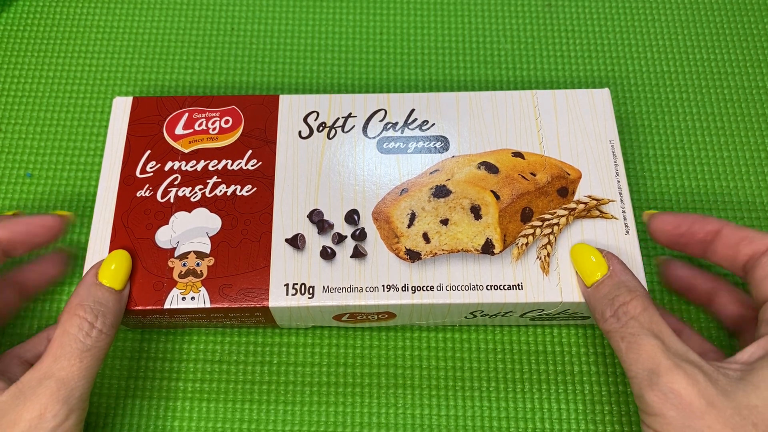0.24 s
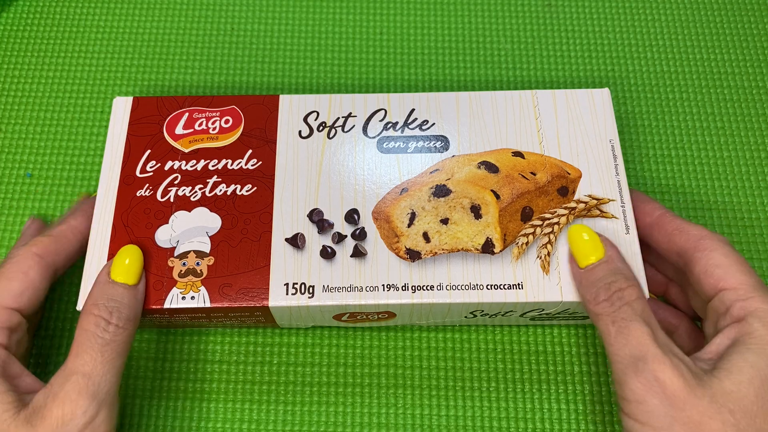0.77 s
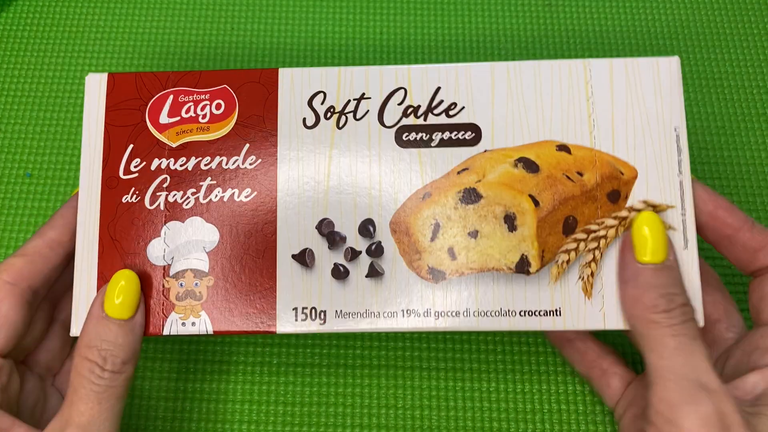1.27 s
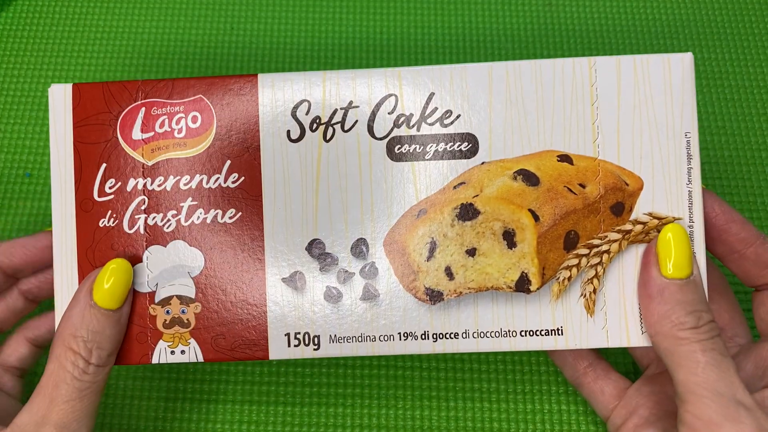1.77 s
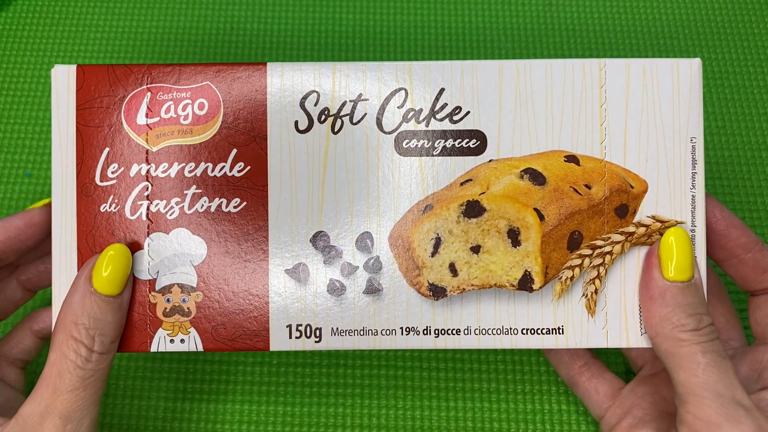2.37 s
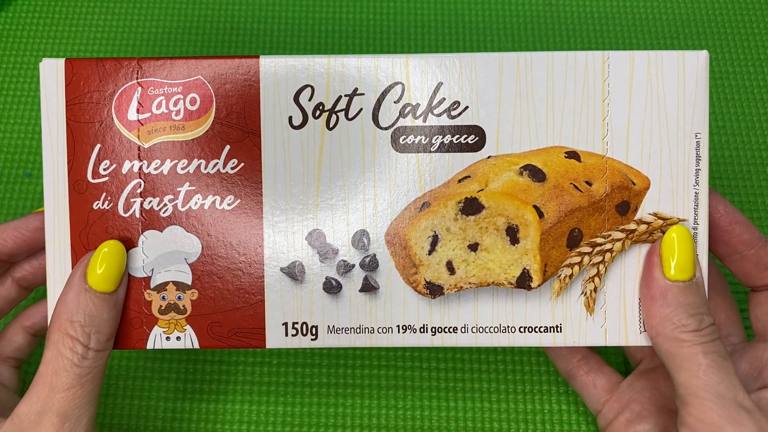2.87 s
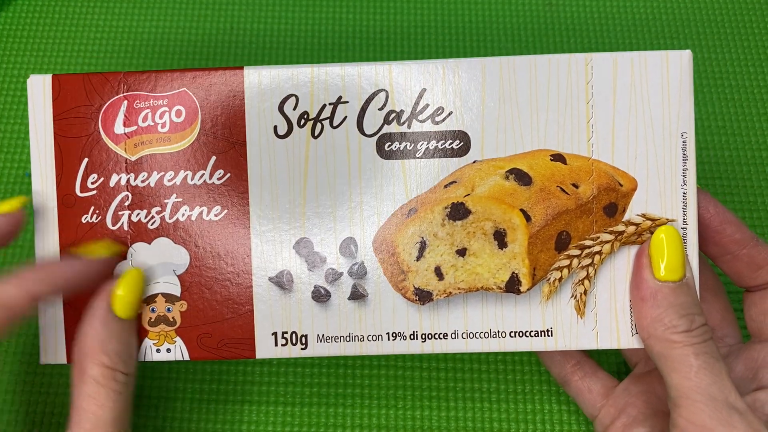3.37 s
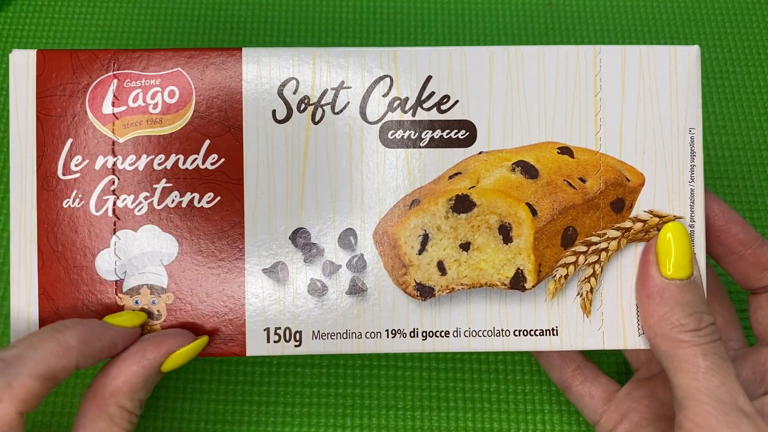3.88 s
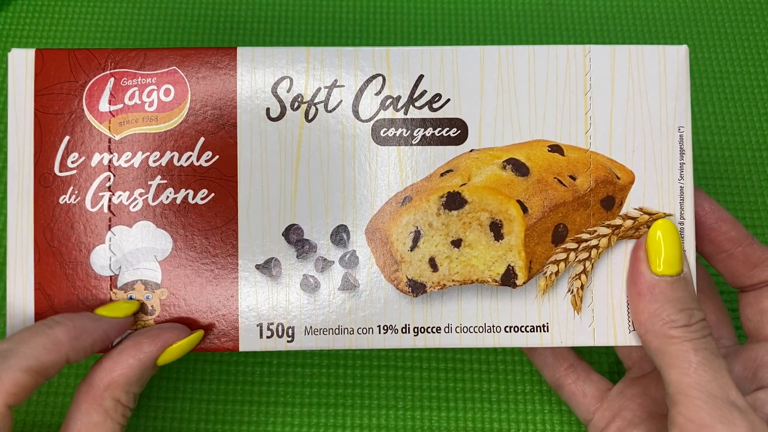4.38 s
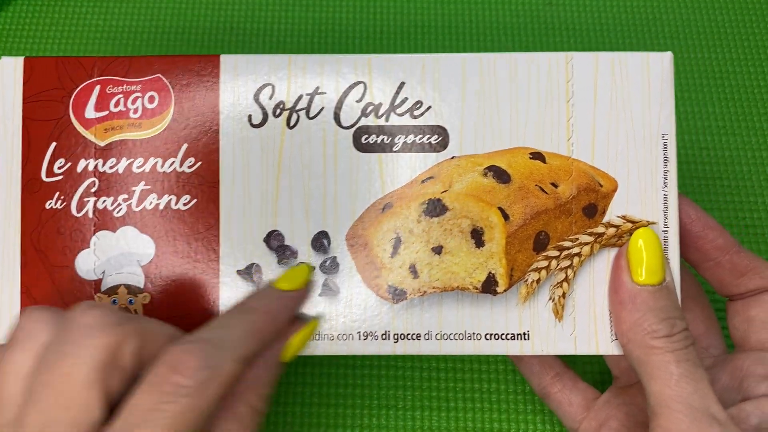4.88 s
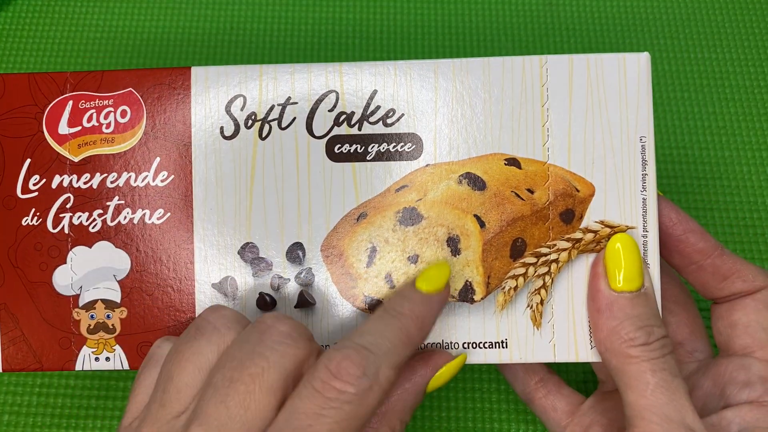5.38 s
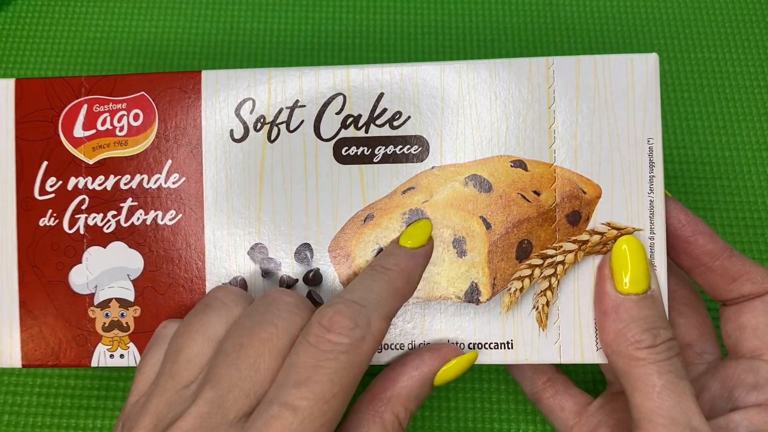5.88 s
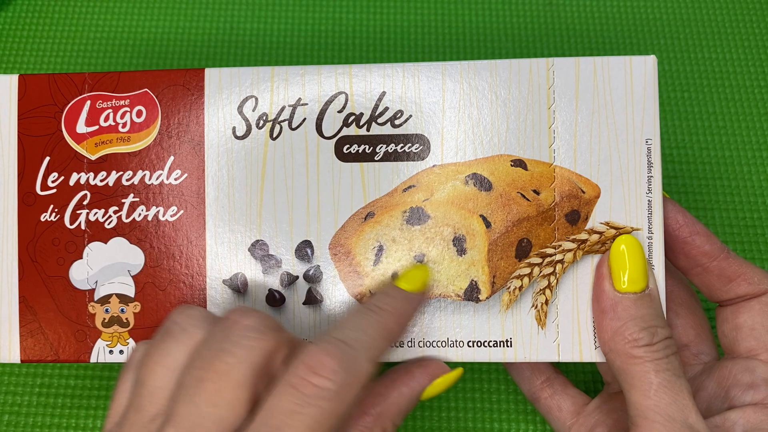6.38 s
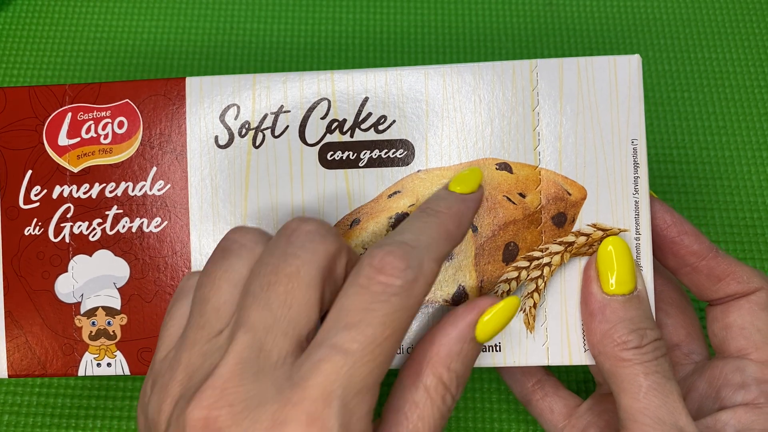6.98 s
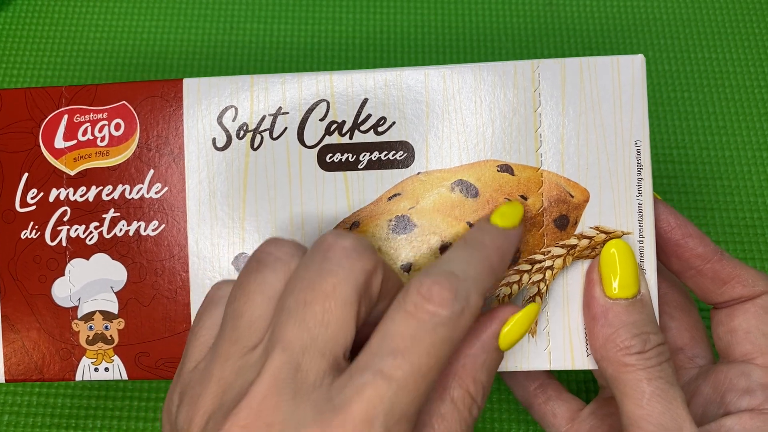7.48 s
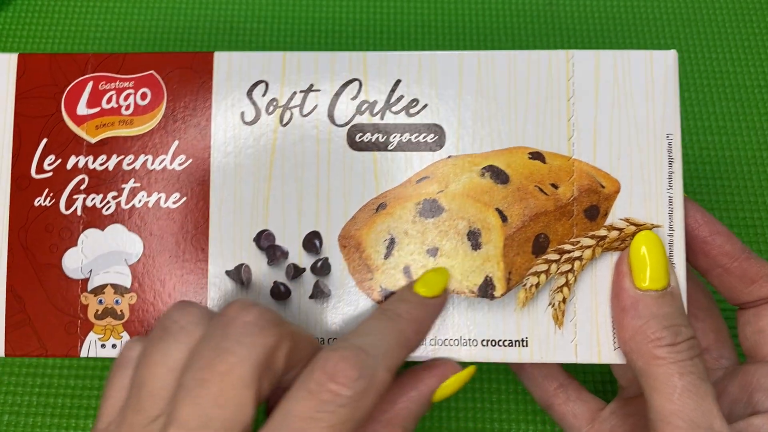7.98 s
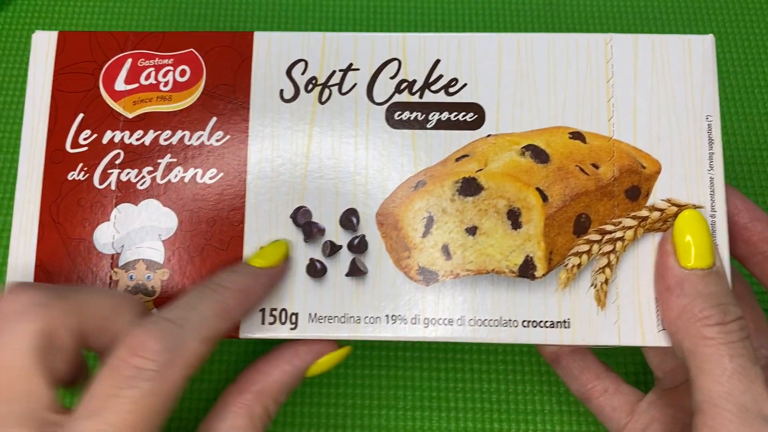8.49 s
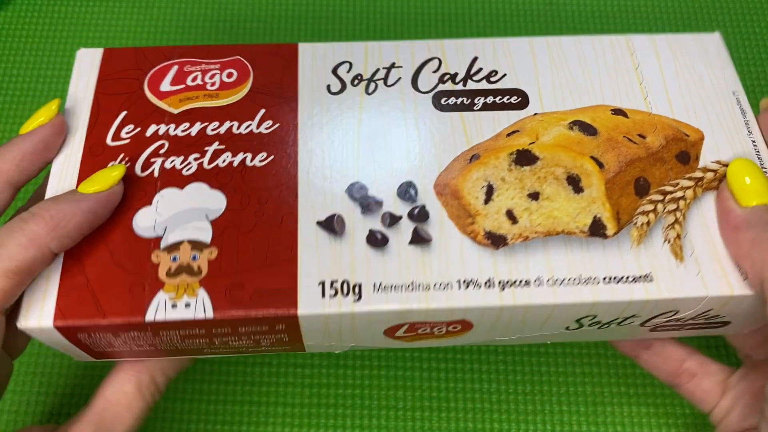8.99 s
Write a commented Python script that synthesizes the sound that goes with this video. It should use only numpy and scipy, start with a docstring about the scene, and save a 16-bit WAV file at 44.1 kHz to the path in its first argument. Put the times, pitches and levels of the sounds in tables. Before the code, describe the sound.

In a small, quiet room, close fingernail taps make a thin cardboard box tick and knock with a short hollow ring. The tapping starts busy and irregular, then thins out and softens while fingertips rub quietly across the surface. A few soft handling thumps come at the end. Behind it, the phone microphone picks up a faint wavering hum and a far engine rising in pitch outside.

```python
"""In a small room, fingernails tap a thin cardboard box close to a phone, first on its ends, then on
its face. Each tap sends a bending wave through the card (treble first, bass late) and makes the
hollow box ring. Between taps, fingers slide over the card and bump it as they shift their grip.
A low hum wavers underneath, and a far engine revs up outside."""
import sys
import numpy as np
from scipy import signal
from scipy.fft import rfft, irfft, next_fast_len
from scipy.io import wavfile
from scipy.ndimage import uniform_filter1d

SR = 44100
rng = np.random.default_rng(int(sys.argv[2]) if len(sys.argv) > 2 else 0)


def to_wav(sig):
    """Store sig (one row per channel, or 1-D mono) as 16-bit WAV at the path in sys.argv[1].

    Samples outside -1..1 are clipped; the rate is SR.
    """
    pcm = np.clip(np.atleast_2d(sig), -1, 1) * 32767
    pcm = np.round(pcm).astype(np.int16)
    wavfile.write(sys.argv[1], SR, pcm.T)  # frames by channels


N = 407484

# The tones the box rings with. Each row: pitch in Hz, level in dB when tapped on the ends,
# level in dB when tapped on the face, seconds to fade by 60 dB (called t60).
BOX_TONES = [(88.7, -13, -16, 0.023), (143.4, 1.5, 9, 0.063), (206, -8, -9.5, 0.16),
             (288.6, -6, -8.5, 0.067), (319.2, -7, -11.5, 0.16), (333, 5, 7, 0.016),
             (403.8, -4.5, -9.5, 0.1), (543.8, -10.5, -11.5, 0.096), (535, -25, 8, 0.023),
             (581, -17, 7, 0.014), (762, -17.5, -20.5, 0.22), (772, 10.5, 4.5, 0.023),
             (853, -9.5, -16.5, 0.11), (907, 5, -1.5, 0.022), (1043, -12.5, -18.5, 0.059),
             (1241, -5, -14.5, 0.063), (1284, 6, -36, 0.0081), (1569, -8.5, -8.5, 0.03),
             (2000, -2, 1.5, 0.015), (2102, 0, 5, 0.011), (2940, -10.5, -8, 0.016), (3450, -4, 10.5, 0.002)]


def nail_taps():
    """A nail ticks, the card bends and the box rings. Gives the close sound and what feeds the room."""
    # Each row: start in seconds, level in dB, then the relative strength in dB of the box's hollow
    # ring, the knock of its side walls and the tick of the nail.
    taps = [(0.005, -32.5, -7, -13, 0), (0.023, -24, -24, -18.5, -11.5), (0.263, -38, -19, -18.5, -5.5),
            (0.303, -49.5, -20, -16, -7), (0.33, -24, -10, -11.5, -17), (0.337, -27, -20, -13, -3.5),
            (0.393, -25.5, -26, -12, -11.5), (0.463, -20.5, -12.5, -12.5, -14.5),
            (0.484, -29.5, -33, -13, -19), (0.522, -21.5, -12.5, -16.5, -5.5),
            (0.78, -44.5, -7.5, -14, -2.5), (0.887, -54, -28, -9, 5.5), (0.915, -47, -38, -8, -6),
            (0.93, -44, -39, -9.5, -6.5), (1.052, -45, -12.5, -21, -2.5), (1.241, -47, -20, -9, -15),
            (1.374, -51, -4, -7, -4), (1.412, -48, -15, -10, -11.5), (1.619, -40, -13, -15, -6.5),
            (1.688, -23, -12.5, -11.5, -16.5), (1.792, -18.5, -15.5, -16.5, -20),
            (1.858, -18.5, -14.5, -17.5, -8.5), (2.093, -40.5, -3.5, -15.5, -9), (2.171, -47, -22, -7, -11),
            (2.189, -28.5, -6, -13.5, -10), (2.323, -20.5, -14.5, -19, -17.5),
            (2.404, -24, -21.5, -19.5, -10), (2.642, -37, -11, -14, -5), (2.732, -28.5, -6.5, -11.5, -11),
            (2.853, -21, -17.5, -20, -20), (2.993, -24.5, -22, -19.5, -7), (3.293, -51, -32, -11, -18),
            (3.484, -32, -19, -14, -15.5), (3.901, -18.5, -23.5, -13, -17.5), (3.98, -51, -18, -3, -20),
            (3.996, -56, -25, -20, -8.5), (4.131, -27, -20.5, -15, -14.5),
            (4.36, -19.5, -23.5, -12.5, -17.5), (4.553, -20.5, -20.5, -11.5, -18),
            (4.695, -44.5, -22, -13, -29), (4.747, -38, -43, -7, -30), (4.763, -53, -28, -7, 4),
            (4.81, -34, -52, -11, -14), (5.38, -56, -27, -10, -23), (5.641, -38.5, -12.5, -12, -20.5),
            (5.771, -50.5, -13, -14, -10), (5.783, -45.5, -14, -20, -17), (5.928, -44, -20, -13, -12),
            (5.934, -37, -10, -24, -13.5), (6.003, -55, -5.5, -9, -10), (6.229, -32, -19, -7.5, -26),
            (6.342, -58, 0, 2, -23), (6.528, -33, -16.5, -2, -12), (6.82, -51, -13, -22, -24),
            (6.832, -42.5, -10, -18, -21), (7.085, -25.5, -13.5, -14.5, -11),
            (7.265, -36.5, -15.5, -17, -18), (7.463, -34, -13.5, -14.5, -11), (7.651, -32, -16, -18, -18.5),
            (7.702, -51, -19, -18, -12.5), (7.872, -53.5, -25, -10, -14), (8.598, -48.5, -1, -6, -20),
            (8.63, -47.5, -5, -9, -21), (8.712, -45.5, -3.5, -23, -10), (8.736, -49.5, -9, -23, -7),
            (8.942, -45.5, -4, -23, -1.5), (9.183, -39.5, -15, -6, -5)]
    # The middle pitch in Hz of each part of a tap: thud, hollow ring, knock and snap.
    parts_hz = [130, 300, 780, 1700]
    face_from_s, snap_db, glide_s = 3.2, -11, 0.000675
    t = np.arange(SR // 5) / SR
    early = t[:SR // 40]
    hz, ends_db, face_db, t60 = np.transpose(BOX_TONES)
    envelopes = box_envelopes(t)
    spots = rng.standard_normal((len(taps), 2, len(hz)))
    grits = rng.standard_normal((len(taps), len(early)))
    # short bending waves travel faster, so the pitch falls from 4500 Hz
    bend = -np.sin(2 * np.pi * 4500 * glide_s * np.log1p(t / glide_s))
    bend *= fade(t, 0.016) * (1 - np.exp(-t / 0.00016))
    click = band(1. * (early == 0), 2800, 9500)
    out = np.zeros((2, N + len(t)))
    for (start, db, hollow_db, knock_db, tick_db), (spot, shift), grit in zip(taps, spots, grits):
        on_face = start > face_from_s
        thud_db = -31.5 - 0.3 * (db + 25)  # light taps have a larger share of thud
        parts_db = np.interp(np.log(hz), np.log(parts_hz), [thud_db, hollow_db, knock_db, snap_db])
        spot_db = (face_db if on_face else ends_db) + 1.4 * spot
        spot_hz = hz * (1 + .0007 / t60 * shift)  # short tones depend most on where the nail lands
        body = box_ring(t, envelopes, 0.5 + parts_db + spot_db, spot_hz) + undb(snap_db + 7) * bend
        # the nail lands, then scrapes a little; light taps land more slowly
        stretch = undb(2.5 * max(-40 - db, 0))
        contact = fade(early, 0.0014 * stretch) / np.sqrt(stretch) + 0.19 * fade(early, 0.032)
        tick = band(grit * contact, 2300, 11200)
        close, to_room = body.copy(), body.copy()
        close[:len(early)] += undb(tick_db + 10) * tick
        to_room[:len(early)] += undb(tick_db + 10) * (0.22 * tick + 2.46 * click)
        # the nail chatters once, which colours each tap differently
        lag = int(SR * 0.00045 * (1 + abs(shift[0])))
        close[lag:] += 0.26 * close[:-lag]
        if on_face:
            to_room *= undb(-3.5)  # the face points at the phone, so less room is heard
        i = int(start * SR)
        out[:, i:i + len(t)] += undb(db + 3.5) * np.array([close, to_room])
    return out[:, :N]


def box_envelopes(t, length=1):
    """How each box tone swells and fades: low ones swell late, and neighbours swing opposite ways."""
    hz, *_, t60 = np.transpose(BOX_TONES)[:, :, None]
    signs = (-1.) ** np.arange(len(BOX_TONES))[:, None]
    return (1 - np.exp(-t * hz / 0.42)) * fade(t, length * t60) * signs


def box_ring(t, envelopes, spot_db, hz):
    """The box's tones added up, each as strong as the touched spot makes it."""
    return undb(spot_db) @ (envelopes * np.sin(2 * np.pi * hz[:, None] * t))


def finger_slides():
    """Skin hisses over the printed card, and its many tiny catches and slips make the box ring."""
    # One list per slide. Each row: time in seconds, skin hiss in dB, then the rasp of the face
    # and the drone of the walls, both in dB above the hiss.
    slides = [
        [(0.66, -79.5, 14.5, -2), (0.76, -57.5, -27, -25), (0.816, -69, 1.5, -5), (0.916, -63.5, 3, -2),
         (0.95, -64.5, -9, -1), (1.03, -71.5, -8, -2), (1.055, -72, 0, 0), (1.148, -69, -0.5, -7),
         (1.216, -98, -7, 8), (1.24, -63, 4, -3), (1.33, -78, 3, -1), (1.385, -65.5, 7.5, 9),
         (1.45, -68, -5, -5), (1.504, -60.5, -9, -6), (1.58, -99, 0, 3)],
        [(3.18, -99, 5, -5), (3.262, -70, 1, -11), (3.362, -98, 4, 0), (3.39, -68, -4, -7),
         (3.47, -61.5, -9, -11), (3.52, -78, 5, 7), (3.728, -76, -1, -7), (3.8, -98, 7, -1)],
        [(4.64, -81.5, 12, 18.5), (4.77, -55, 12.5, 2), (4.866, -55.5, 8.5, -6), (5.022, -62, 4, 11),
         (5.094, -60.5, 7, 3.5), (5.254, -61, 0.5, 7), (5.366, -90, 14, 12), (5.41, -64, -1, 0),
         (5.44, -97, -8, 3)],
        [(6.8, -100, 9, 2), (6.836, -68, 5, 6), (6.92, -87, 6, 5)],
        [(7.84, -110, 0, 0.5), (7.898, -64.5, -14, -20), (8.08, -68, -15, -19), (8.112, -61, 4, -4),
         (8.35, -66, -1, 0.5), (8.576, -59, 1, -5.5), (8.662, -57.5, -9, -14), (8.93, -62.5, -7, -9),
         (8.966, -67.5, 2, 3), (9.142, -67.5, 4.5, 5), (9.19, -62, -6, -9), (9.24, -65, -4, -6)],
    ]
    # How unevenly the skin grips: one level wobble in dB per slide.
    wobbles_db = [4.2, 2, 0.82, 1, 1.35]
    # The colour of the skin hiss. Each row: frequency in Hz, relative level in dB.
    hiss_colour = [(1760, 1.5), (3000, -1), (4080, 0), (4940, 1), (12800, 1.5), (15500, -8), (16200, -40),
                   (16500, -52)]
    # The ranges of rasp, drone and hollow ring. Each row: low edge in Hz, high edge in Hz.
    card_bands = [(943, 2850), (547, 950), (280, 435)]
    t = np.arange(N) / SR
    gains = np.zeros((4, N))
    grip = wander(45)
    for rows, wobble_db in zip(slides, wobbles_db):
        times, hiss_db, rasp_db, drone_db = np.transpose(rows)
        hollow_db = drone_db - 5.5
        sliding = (t >= times[0]) & (t <= times[-1])
        for gain, extra_db in zip(gains, (0, rasp_db, drone_db, hollow_db)):
            level_db = np.interp(t[sliding], times, hiss_db + extra_db)
            gain[sliding] = undb(level_db + wobble_db * grip[sliding])
    catch_db = 1.8 * wander(110)
    slips = rng.standard_normal(N) * undb(2.62 * rng.exponential(size=N) + catch_db)
    hz, ends_db, _, t60 = np.transpose(BOX_TONES)
    slip_db = ends_db + 4.9 * np.log(hz) + 0.96 * np.log(t60)  # tiny slips favour the high tones
    ring_t = t[:SR // 8]
    slip_ring = box_ring(ring_t, box_envelopes(ring_t, length=0.5), slip_db, hz)
    card = signal.fftconvolve(slips, slip_ring)[:N]
    friction = rng.standard_normal(N) * undb(2.0 * rng.exponential(size=N) + 0.63 * wander(76))
    hiss = gains[0] * colour(friction, hiss_colour)
    return hiss + sum(gain * unit(band(card, *edges)) for gain, edges in zip(gains[1:], card_bands))


def grip_bumps():
    """Soft finger pads thump the whole box as the grip changes."""
    # Each row: start in seconds, level in dB, pitch in Hz.
    bumps = [(5.938, -57, 148), (8.597, -42, 390), (8.66, -46, 280), (8.711, -52, 200), (8.741, -45.5, 220),
             (9.042, -49, 111), (9.185, -43, 231)]
    ring_cycles = 11
    t = np.arange(SR // 8) / SR
    out = np.zeros(N + len(t))
    for start, db, hz in bumps:
        envelope = fade(t, ring_cycles / hz) * (1 - np.exp(-t * hz / 0.2))
        i = int(start * SR)
        out[i:i + len(t)] += undb(db) * envelope * np.sin(2 * np.pi * hz * t)
    return out[:N]


def room_echo(x):
    """The room's echoes blur into a brief tail, shorter in the treble."""
    # Each row: middle of a band in Hz, seconds to fade by 60 dB, relative level in dB.
    echo_bands = [(178, 0.31, 5), (567, 0.49, -5.5), (1296, 0.37, -5), (3300, 0.25, -4), (6550, 0.31, -3),
                  (14040, 0.28, -0.5)]
    t = np.arange(SR // 2) / SR
    tail = sum(undb(db) * fade(t, t60) * band(rng.standard_normal(len(t)), hz / 1.92, hz * 2.01)
               for hz, t60, db in echo_bands)
    build_up = 1 - np.exp(-(t / 0.0013) ** 2)
    return signal.fftconvolve(x, undb(-38.5) * tail * build_up)[:N]


def room_air():
    """The air of the room: a faint, deep rush whose level drifts a little."""
    # Each row: frequency in Hz, relative level in dB.
    air_colour = [(41, -47), (70, -10), (205, -14.5), (235, -18), (295, -19), (446, -23.5), (948, -31),
                  (1190, -27), (1280, -33), (11700, -44.5), (16500, -51)]
    return undb(-66 + 0.67 * wander(3.1)) * colour(rng.standard_normal(N), air_colour)


def low_hum():
    """A low tone wavers in pitch and level; a murmur around it makes it throb."""
    # Each row: time in seconds, base level in dB.
    levels = [(0.0, -63), (1.36, -61.5), (3.3, -67), (3.8, -74), (4.9, -62.5), (5.7, -63.5), (8.85, -63.5),
              (9.24, -66)]
    t = np.arange(N) / SR
    hz = 49.6 + 1.42 * wander(1.5)
    level_db = np.interp(t, *np.transpose(levels)) + 2.0 + 2.6 * wander(7)
    murmur = undb(-87) * unit(band(rng.standard_normal(N), 46, 53))
    return undb(level_db) * np.sin(2 * np.pi * np.cumsum(hz) / SR) + murmur


def far_engine():
    """An engine's firing makes one throbbing tone that climbs, fades and comes back lower."""
    # Each row: time in seconds, firing pitch in Hz, level in dB.
    revs = [(3.6, 94.3, -90), (3.801, 110.7, -60.5), (4.1, 133, -60), (4.4, 157.9, -55.5), (4.7, 172, -67),
            (5.302, 170, -64.5), (5.552, 193.3, -76.5), (5.648, 206.2, -69), (6.102, 207, -64.5),
            (6.25, 218, -94.5), (7.299, 159, -94.5), (7.5, 155.3, -66), (8.1, 155.4, -70.5),
            (8.3, 148, -100)]
    t = np.arange(N) / SR
    times, hz, db = np.transpose(revs)
    firing_hz = np.interp(t, times, hz) * (1 + 0.019 * wander(5.3))
    level_db = np.interp(t, times, db) + 4 * wander(24)
    return undb(level_db) * np.sin(2 * np.pi * np.cumsum(firing_hz) / SR)


def undb(db):
    """Turns decibels into a factor to multiply by."""
    return 10 ** (np.asarray(db) / 20)


def unit(x):
    """Scales a sound to an average power of 1."""
    return x / np.sqrt(np.mean(x ** 2))


def fade(t, t60):
    """Dies away by 60 dB every t60 seconds."""
    return np.exp(-np.log(1000) * t / t60)


def band(x, low_hz, high_hz):
    """Keeps the part of a sound between two frequencies."""
    edges = [low_hz, min(high_hz, .45 * SR)]
    return signal.sosfilt(signal.butter(2, edges, "bandpass", fs=SR, output="sos"), x)


def colour(x, points):
    """Shapes a noise along a curve of (Hz, dB) points."""
    size = next_fast_len(len(x))
    hz, db = np.transpose(points)
    frequencies = np.arange(size // 2 + 1) * SR / size
    gain_db = np.interp(np.log(frequencies + 1), np.log(hz), db)
    return unit(irfft(rfft(x, size) * undb(gain_db), size)[:len(x)])


def wander(rate):
    """A smooth random curve that heads for a new value `rate` times a second."""
    hold = int(SR / rate)
    steps = np.repeat(rng.standard_normal(N // hold + 1), hold)
    return 1.36 * uniform_filter1d(uniform_filter1d(steps, hold), hold)[:N]


def scene():
    """Nails and fingers on the box, their echo and the background, in one channel."""
    tapping, to_room = nail_taps()
    fingers = finger_slides() + grip_bumps()
    echo = room_echo(to_room + fingers)
    return (tapping + fingers + echo + room_air() + low_hum() + far_engine())[None]


def record(dry):
    """The phone cuts the deep bass and the highest treble."""
    low_hz, top_hz = 40, 16500
    dry = signal.sosfilt(signal.butter(4, low_hz, "highpass", fs=SR, output="sos"), dry)
    return signal.sosfilt(signal.ellip(8, .2, 70, top_hz, fs=SR, output="sos"), dry)


dry = scene()
out = record(dry)
to_wav(out)
```